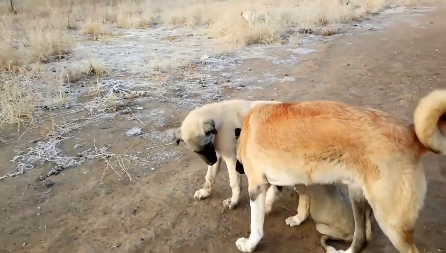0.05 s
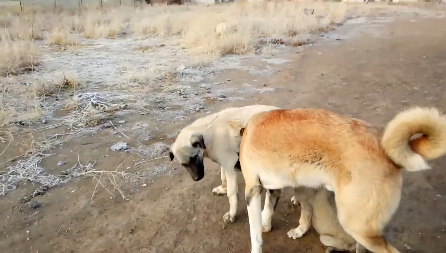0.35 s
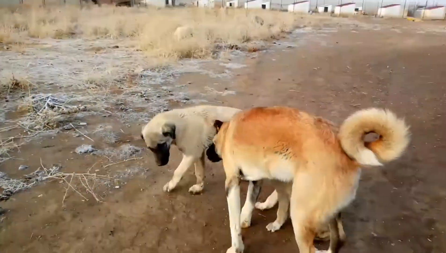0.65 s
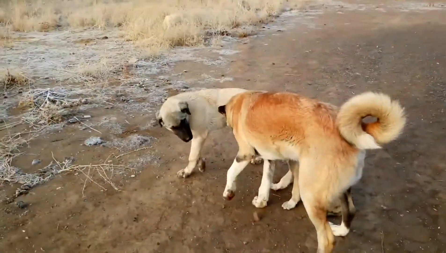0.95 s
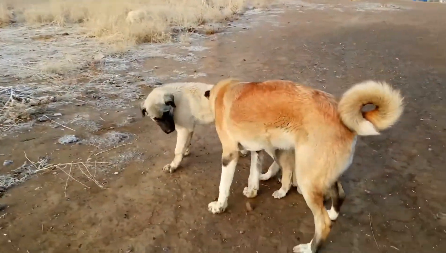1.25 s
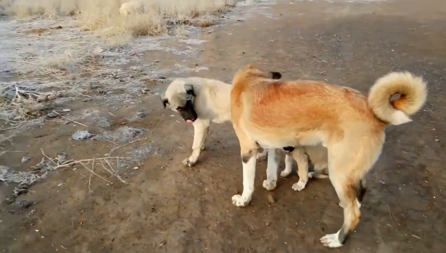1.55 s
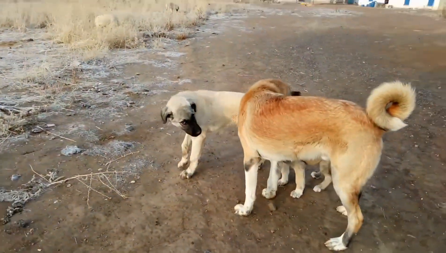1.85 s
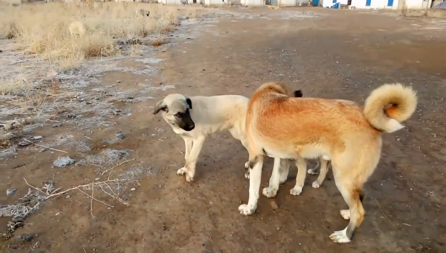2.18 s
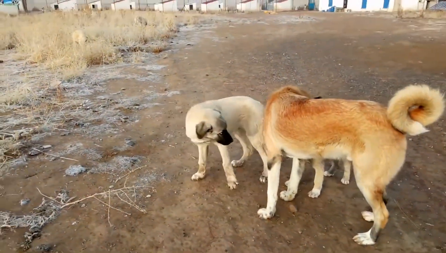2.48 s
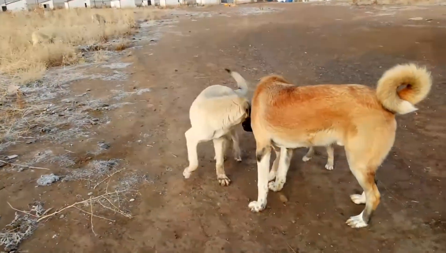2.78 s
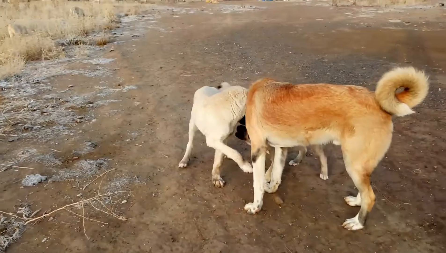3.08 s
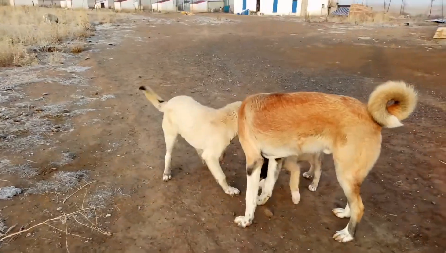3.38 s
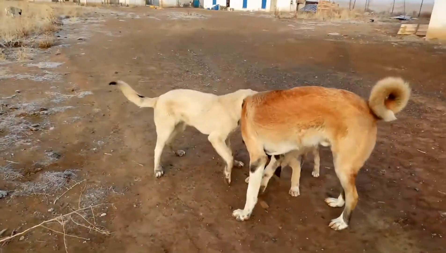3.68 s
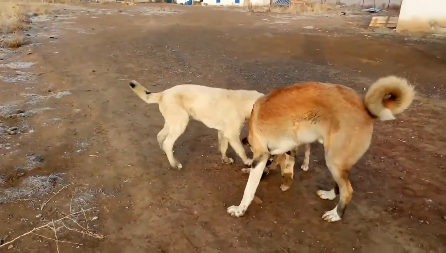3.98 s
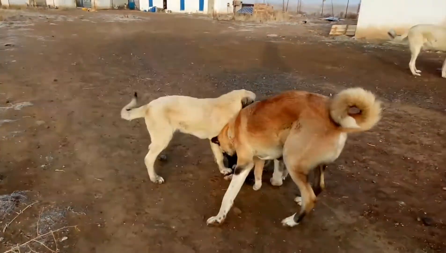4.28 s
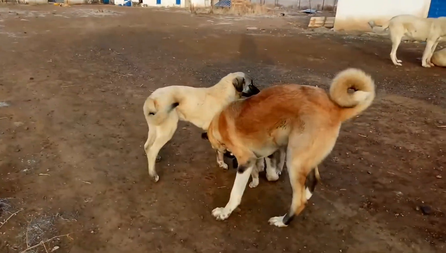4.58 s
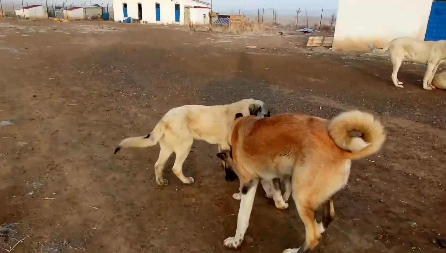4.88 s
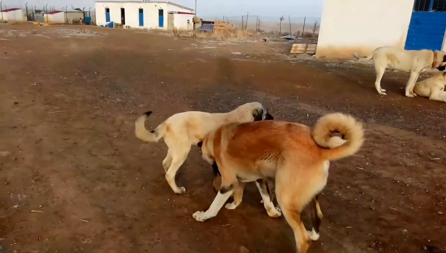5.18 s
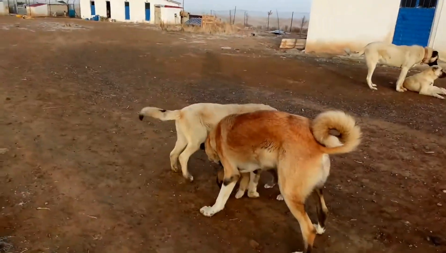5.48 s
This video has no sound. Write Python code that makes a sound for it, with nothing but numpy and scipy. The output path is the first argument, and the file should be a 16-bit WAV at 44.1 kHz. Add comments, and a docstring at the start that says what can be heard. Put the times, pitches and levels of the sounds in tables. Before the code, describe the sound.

Dogs jostle on a dirt yard, making soft mouth smacks and paw scuffs over a faint, distant engine hum. A metal collar starts jingling in light, irregular bursts. After a brief wet splutter, a puppy gives one short, high yelp that falls and turns rough. The collar keeps jingling, more busily now. Nearly everything is heard on the left of the microphone.

```python
"""A far engine hums under soft muzzle smacks and paws scuffing soil as dogs jostle on a dirt yard.
A collar jingles, its metal pieces ringing in their natural modes at each impact, and lips splutter.
Then a puppy's vocal folds give one short falling yelp, with a thin whistle on top, that roughens
as the folds slacken. Nearly everything reaches the left port of the microphone."""
import sys
import numpy as np
from scipy import signal
from scipy.fft import rfft, irfft, next_fast_len
from scipy.io import wavfile
from scipy.ndimage import uniform_filter1d

SR = 44100
rng = np.random.default_rng(int(sys.argv[2]) if len(sys.argv) > 2 else 0)


def pcm_store(signal):
    """Save signal as 16-bit PCM."""
    levels = np.round(np.clip(np.atleast_2d(signal), -1, 1) * 32767)
    wavfile.write(sys.argv[1], SR, levels.astype(np.int16).T)


N = 244137
TIME = np.arange(N) / SR


def from_db(db):
    """Amplitude ratio of a level in decibels."""
    return 10 ** (np.asarray(db) / 20)


def rms_one(x):
    """Normalisation to an rms of 1."""
    return x / np.sqrt(np.mean(x ** 2) + 1e-20)


def in_time(rows):
    """Linear interpolation of each column at every sample; the first column is time in seconds."""
    times, *columns = np.transpose(rows)
    return [np.interp(TIME, times, column) for column in columns]


def gain_at(points, hz):
    """Magnitude response at hz, interpolated between (Hz, dB) points on a logarithmic frequency axis."""
    point_hz, db = np.transpose(points)
    return from_db(np.interp(np.log(hz + 1e-9), np.log(point_hz), db))


def colour(x, points, lag=0):
    """Filtering in the frequency domain; a linear phase delays the sound by lag seconds."""
    size = next_fast_len(N + 4096)
    hz = np.arange(size // 2 + 1) * SR / size
    return irfft(rfft(x, size) * gain_at(points, hz) * np.exp(-2j * np.pi * hz * lag), size)[:N]


def noise(points):
    """White noise filtered to a given spectrum, rms 1."""
    return rms_one(colour(rng.standard_normal(N), points))


def drift(rate):
    """Random modulation through rate new values a second, rms 1."""
    knots = rng.standard_normal(N // 8)
    return rms_one(np.interp(TIME * rate, np.arange(len(knots)), knots))


def phase_of(hz):
    """Phase as the integral of instantaneous frequency."""
    return 2 * np.pi * np.cumsum(hz) / SR


def add(out, start, sound):
    """Superposition of a sound from start seconds on."""
    i = int(start * SR)
    out[i:i + len(sound)] += sound[:max(N - i, 0)]


def bursts(rows, t60):
    """Envelope of sudden onsets (seconds, dB) with exponential decay, 60 dB in t60 seconds."""
    out, t = np.zeros(N), TIME[:SR // 10]
    for start, db in rows:
        add(out, start, from_db(db - 60 * t / t60))
    return out


def swell(start, length):
    """Half-sine envelope: one smooth rise and fall."""
    return np.sin(np.pi * np.clip((TIME - start) / length, 0, 1))


def still_air():
    """Stationary background noise, uncorrelated between the two ports."""
    # Air spectrum at each port. Each row: frequency in Hz, relative level in dB.
    left_spectrum = [(25, -33.5), (40, -14), (55, 0.5), (110, 2), (200, -2.5), (400, -11), (800, -17),
                     (1500, -14.5), (3000, -28.5), (8000, -26), (15000, -33)]
    right_spectrum = [(25, -22), (40, -18), (60, -1), (110, 9), (200, 2), (400, 0), (700, -0.5),
                      (1500, 3.5), (3000, -3), (8000, -8.5), (15000, -11)]
    return np.array([from_db(-63.5) * noise(left_spectrum), from_db(-71.7) * noise(right_spectrum)])


def engine(start_hz=99.5, top_hz=114.6, settle_s=2.35, level_db=-0.3, wander_db=1.1, fade_db_per_s=3):
    """Periodic firing gives a line spectrum; the far engine creeps up in speed as its overtones fade."""
    # Engine orders. Each row: multiple of the firing rate, relative level in dB.
    orders = [(.5, -71.5), (.75, -93), (1, -51), (1.5, -62.5), (2, -68), (2.5, -66)]
    firing_hz = top_hz - (top_hz - start_hz) * np.exp(-TIME / settle_s)
    phase = phase_of(firing_hz * (1 + 0.00614 * drift(8)))
    hum = np.zeros(N)
    for order, db in orders:
        fade_db = (order > 1) * fade_db_per_s * TIME
        hum += from_db(level_db + db + wander_db * drift(10) - fade_db) * np.sin(order * phase)
    return hum


def rustle(level_db=-2, grain_db=3):
    """Friction of chain and coats makes fine bright noise; small impacts of grit add sharper ticks."""
    # Friction envelope and grit ticks. Each row: time in seconds, relative level in dB.
    friction_levels = [(0, -69), (.3, -72.5), (.68, -63), (1.08, -79), (1.16, -59), (1.55, -61),
                       (1.92, -71.5), (2.15, -60), (2.3, -75), (2.58, -59), (2.72, -70.5), (2.9, -56),
                       (3.14, -75.5), (3.38, -58.5), (3.58, -65), (3.71, -49.5), (3.87, -63.5),
                       (4.2, -51.5), (4.52, -55.5), (4.68, -58), (4.88, -54.5), (5.54, -56)]
    ticks = [(.093, -48), (.334, -44.5), (.402, -48.5), (.650, -45.5), (1.002, -48), (1.150, -48.5),
             (1.214, -48.5), (2.900, -48.5), (3.434, -46.5), (4.605, -44.5)]
    # Their spectra. Each row: frequency in Hz, relative level in dB.
    friction_spectrum = [(3000, -12), (6500, -17), (8200, -11), (9200, -1.5), (9900, 1), (10700, -4),
                         (11800, -24.5), (15000, -30)]
    grit_spectrum = [(800, -43), (3000, -17.5), (7500, -16.5), (9900, 5.5), (12000, -15), (15000, -41)]
    db, = in_time(friction_levels)
    friction = from_db(db + level_db + grain_db * drift(150)) * noise(friction_spectrum)
    return friction + bursts(ticks, t60=0.051) * noise(grit_spectrum)


def scuffs(grain_db=3):
    """Sliding friction of paws on soil gives bands of grainy noise, uncorrelated between the ports."""
    # Each row: start in seconds, length in seconds, left level in dB, centre in Hz, left over right in dB.
    drags = [(1.124, 0.039, -47, 276, 22), (1.156, 0.082, -52, 396, 27), (1.123, 0.13, -61.5, 1200, 7),
             (1.209, 0.017, -65, 1950, -10), (0.627, 0.046, -64.5, 3160, 7), (1.907, 0.023, -62, 2300, -3),
             (2.376, 0.055, -57, 5100, 25), (3.679, 0.05, -45, 4860, 22), (4.65, 0.15, -49.5, 635, 16),
             (4.661, 0.14, -56, 1360, -4.5), (4.697, 0.013, -55, 2200, -11.5), (4.896, 0.11, -61, 1080, 10),
             (5.416, 0.11, -57, 1300, 15)]
    out = np.zeros((2, N))
    grains = rng.standard_normal((2, N)) * from_db(grain_db * drift(250))
    for start, length, db, hz, pan_db in drags:
        soil = signal.butter(1, [hz / np.sqrt(2), hz * np.sqrt(2)], "band", fs=SR, output="sos")
        scrape = rms_one(signal.sosfilt(soil, signal.sosfilt(soil, grains)))
        out += from_db([[db], [db - pan_db]]) * swell(start, length) * scrape
    return out


def muzzle(ramp_s=0.0016, wobble=0.08, mouth_hz=1280, mouth_t60=0.011, mouth_db=-5):
    """Lips part with a snap, an impulse that excites a damped resonance of the mouth cavity."""
    # Pops of a wet splutter. Each row: start in seconds, level in dB.
    pops = [(3.665, -24), (3.6767, -24.5), (3.682, -27), (3.7, -32), (3.722, -38.5)]
    # Spectrum of a lip snap. Each row: frequency in Hz, relative level in dB.
    snap_spectrum = [(400, -45), (1300, -23), (2500, -6.5), (4800, 5.5), (8000, 7.5), (10500, 6.5),
                     (13000, -34)]
    # Soft smacks. Each row: start in seconds, relative level in dB, resonance in Hz, t60 in seconds.
    smacks = [(.404, -48, 944, .022), (.405, -48.5, 590, 0.019), (0.522, -39.5, 925, 0.022),
              (.730, -36, 870, 0.014), (1.187, -46.5, 447, 0.039), (1.832, -46, 495, 0.017),
              (2.318, -35.5, 404, 0.0075), (2.778, -41.5, 1090, 0.021), (3.961, -54, 388, 0.042),
              (4.389, -46.5, 867, 0.02)]
    t = TIME[:SR // 10]
    out = bursts(pops, t60=0.0055) * noise(snap_spectrum)
    for start, db in pops:
        add(out, start, from_db(db + mouth_db - 60 * t / mouth_t60) * np.sin(2 * np.pi * mouth_hz * t))
    for start, db, hz, t60 in smacks:
        tone = np.sin(phase_of(hz * (1 + wobble * drift(620)[:len(t)])))
        add(out, start, from_db(db - 60 * t / t60) * (t / ramp_s) * tone)
    return out


def whimpers(octave_db=3):
    """Faint voicing: two harmonics under a slight random frequency modulation."""
    # Each row: start in seconds, length in seconds, pitch in Hz, level of the fundamental in dB.
    whines = [(3.144, 0.033, 975, -57.5), (3.263, 0.049, 975, -60.5)]
    out, waver = np.zeros(N), 1 + 0.017 * drift(180)
    for start, length, hz, db in whines:
        phase = phase_of(hz * waver)
        harmonics = np.sin(phase) + from_db(octave_db) * np.sin(2 * phase)
        out += from_db(db) * swell(start, length) * harmonics
    return out


def struck_metal(strikes, groups, level_db, damping, tail_db, tail_t60, rise_s, detune_hz):
    """Free vibration: groups of damped modes ring until they settle or the next strike takes over."""
    # Each strike: start in seconds, ring time in seconds, then a relative level in dB for each group.
    out, rows = np.zeros(N), np.array(strikes)
    next_starts = np.append(rows[1:, 0], np.inf)
    for (start, ring_s, *group_dbs), next_start in zip(rows, next_starts):
        t = TIME[:int(np.clip(next_start - start + 0.01, 0.01, 0.2) * SR)]
        attack = 1 - np.exp(-t / rise_s)
        release = np.exp(-np.maximum(t + start - next_start, 0) / rise_s)
        # Damping grows as the metal falls back against the fur; a faint free ring stays.
        loss = np.log(1000) * (t / ring_s) ** damping
        free_ring = from_db(tail_db - 60 * t / tail_t60)
        for db, modes in zip(group_dbs, groups):
            for hz, mode_db, ring_factor in modes:
                decay = np.exp(-loss / ring_factor ** damping) + free_ring
                detuned_hz = hz + detune_hz * rng.standard_normal()
                tone = np.sin(2 * np.pi * (detuned_hz * t + rng.random()))
                add(out, start, from_db(level_db + db + mode_db) * attack * release * decay * tone)
    return out


def metal_contact(contacts, rebound_s=0.024, rebound_db=-12):
    """Each impact (seconds, dB) is a broadband transient: a dry tick, chatter and a lighter rebound."""
    # Spectrum of metal touching metal. Each row: frequency in Hz, relative level in dB.
    spectrum = [(1500, -19), (2400, -27), (2950, 3), (3400, -7.5), (4400, -11.5), (5200, -4), (6000, -14),
                (7200, 8), (9000, 7.5), (10000, 9.5), (11500, 0.5), (12600, -19), (14100, -10),
                (15200, -18)]
    rebounds = [(start + rebound_s, db + rebound_db) for start, db in contacts]
    chatter = from_db(-4 + 2 * drift(760)) * bursts(contacts, t60=0.095)
    ticks = from_db(-1) * bursts(contacts + rebounds, t60=0.012)
    return uniform_filter1d(chatter + ticks, size=64) * noise(spectrum)


def collar(rub=0.13, free_ring_s=0.0667, choke_db_per_s=752, firm_clink_db=-33, top_growth=0.45):
    """Impacts excite the modes of two large pieces and the chain links; harder ones favour overtones."""
    # Seven mode groups: low tones of the larger and the smaller piece, overtones of each, then the body,
    # bright and top modes of the links. Each row: frequency in Hz, relative level in dB, ring time factor.
    mode_groups = [
        [(2826, -.5, 1.0), (2885, -14, .85), (3100, -20, .7)],
        [(3529, -4, 1.0)],
        [(7209, -.5, 1.0), (14412, -23, 1.2)],
        [(8227, .5, 1.0), (14425, -26, 1.0)],
        [(5391, -12, 1.15), (5683, -13, .65), (6204, -6, .6), (6415, -7, .7)],
        [(9283, -14, .6), (9840, -3, .55), (10060, -11, .55)],
        [(12534, -5, .55), (14060, -12, .55)],
    ]
    # The large pieces knock. Each row: start in seconds, relative level of the low tone in dB,
    # overtone over low tone in dB, smaller piece over larger in dB, ring time in seconds.
    knocks = [(1.318, -27, 6, -8, 0.069), (1.516, -48, -1, -9.5, .35), (1.543, -43, -2.5, -1.5, 0.27),
              (1.605, -25.5, -2, -2.5, 0.073), (1.636, -47, 5.5, -5, 0.13), (1.766, -46.5, -20, -10, 0.062),
              (1.848, -55.5, 13.5, -20, 0.057), (2.072, -59.5, 8.5, -9, 0.075), (2.105, -40, 1, -18, 0.08),
              (2.134, -46, -15, -9, 0.1), (2.449, -40.5, -8.5, -1, 0.089), (2.475, -33, -10.5, 6, 0.14),
              (2.513, -33, -9, -3, 0.074), (2.571, -43, 1.5, -12, 0.044), (2.912, -70, 45.5, -15, 0.057),
              (2.967, -72, 30.5, -0.5, 0.055), (3.129, -51, -11, -6, 0.095), (3.219, -47.5, -4, -15, 0.021),
              (3.255, -50, -17, -13, 0.14), (3.342, -27.5, -5.5, -12.5, 0.066),
              (3.378, -40, -13.5, 4.5, 0.064), (3.58, -44.5, 8.5, -3.5, 0.039), (4.11, -25, 7, -4, 0.072),
              (4.264, -51.5, 10.5, 5, 0.059), (4.282, -43, 10.5, 12, 0.13), (4.307, -29.5, 0.5, -4, 0.099),
              (4.479, -37.5, -5, -1, 0.03), (4.498, -28.5, -1, -8.5, 0.03), (4.552, -35.5, -24, -4, 0.061),
              (4.564, -31.5, -19, -15, 0.036), (4.643, -39, 8.5, -7.5, .049), (4.779, -33, 3.5, 5, 0.037),
              (4.805, -34, 12.5, -13.5, 0.059), (5.043, -40, 9.5, -4.5, 0.066), (5.059, -36, -6.5, -8, .35),
              (5.082, -44.5, -9.5, 32, 0.25), (5.127, -45, 4, 12.5, 0.1), (5.158, -33, -1.5, -6.5, .14),
              (5.183, -35.5, 1, -17, 0.05), (5.22, -29.5, -11.5, 14, 0.049),
              (5.244, -35.5, -1.5, 0.5, 0.066), (5.329, -45, 7.5, -12, 0.046), (5.403, -65, 20, 7, 0.13),
              (5.482, -47.5, 4.5, -8, 0.1), (5.514, -35.5, -6, -24, 0.14)]
    # The links clink. Each row: start in seconds, relative bright level in dB, body over bright in dB.
    clinks = [(1.316, -40.5, 5.5), (1.489, -34, -24), (1.544, -36, -11), (1.605, -33, 2.5),
              (1.982, -46.5, -18), (2.036, -34.5, -18), (2.371, -24.5, -21), (2.413, -44.5, 3.5),
              (2.474, -49, -2), (2.513, -33, -4.5), (2.911, -35, -6.5), (2.966, -56, 0), (3.13, -46.5, -17),
              (3.342, -42.5, -28), (3.839, -44.5, -18.5), (3.928, -34, -16), (4.11, -20, -8.5),
              (4.283, -21, 3), (4.304, -25.5, -3), (4.469, -37.5, -0.5), (4.541, -42, 3),
              (4.78, -34.5, 5.5), (4.807, -41, 11.5), (4.976, -47.5, -6), (5.079, -36, -16),
              (5.128, -36, -26), (5.157, -41, -15), (5.221, -36.5, 1)]
    piece_strikes, link_strikes, contacts = [], [], []
    for start, low_db, hardness_db, small_db, ring_s in knocks:
        over_db = low_db + hardness_db
        small_over_db = over_db + small_db
        # Fur that shortens the ring also chokes the low tone of the smaller piece.
        small_low_db = small_over_db - 16 - choke_db_per_s * max(free_ring_s - ring_s, 0)
        link_db = (low_db + over_db) / 2 - 35   # every knock shakes the links a little
        levels = (low_db, small_low_db, over_db, small_over_db, link_db, link_db)
        piece_strikes.append((start, ring_s, *levels))
        contacts.append((start, max(low_db, over_db, small_over_db) - 19))
    for start, bright_db, body_db in clinks:
        mean_db = bright_db + body_db / 2
        top_db = mean_db - 4 + top_growth * (mean_db - firm_clink_db)
        link_strikes.append((start, 0.081, bright_db + body_db, bright_db, top_db))
        contacts.append((start, mean_db - 8))
    ring = struck_metal(piece_strikes, mode_groups, level_db=2.5, damping=1.34,
                        tail_db=-28, tail_t60=0.35, rise_s=0.0017, detune_hz=5.4)
    ring += struck_metal(link_strikes, mode_groups[4:], level_db=2, damping=1.215,
                         tail_db=-31, tail_t60=0.2, rise_s=0.0011, detune_hz=9.2)
    # Pieces that still touch rub on each other and roughen the ring.
    return ring * (1 + rub * drift(700)) + metal_contact(contacts)


def whistle(flutter_hz=125, flutter_depth=0.99, waver=0.0176):
    """A thin tone far above the voice, amplitude-modulated into pulses as the throat slackens."""
    # Course of the whistle. Each row: time in seconds, frequency in Hz, level in dB.
    contour = [(4.027, 8050, -70), (4.034, 8650, -31.5), (4.051, 9460, -18), (4.057, 9600, -51),
               (4.150, 8600, -57), (4.176, 8300, -37), (4.187, 7200, -28), (4.204, 6900, -28.5),
               (4.232, 7850, -31.5), (4.250, 7650, -60)]
    hz, db = in_time(contour)
    start, end = contour[0][0], contour[-1][0]
    flutter = flutter_depth * swell(start=4.168, length=0.067)
    gate = (0.5 + 0.5 * np.cos(2 * np.pi * flutter_hz * (TIME - end))) ** 2
    sounding = (TIME > start) & (TIME < end)
    tone = np.sin(phase_of(hz * (1 + waver * drift(2000))))
    return sounding * from_db(db) * (1 - flutter * (1 - gate)) * tone


def yelp(jitter=0.038, shimmer=0.81, hiss_db=-16, rasp_db=-6, slack_from_s=4.158, slacken_s=0.034):
    """Source and filter: the throat shapes the harmonics of a high voice that falls and turns rough."""
    # Each row: time in seconds, pitch in Hz, effort in dB, nasal boost of the fundamental in dB.
    contour = [(4.036, 1300, -80, 3), (4.053, 1358, -31.5, -7), (4.062, 1156, -31, -1.5),
               (4.082, 1187, -31, 5.5), (4.107, 1175, -31.5, 12.5), (4.116, 1134, -31, 0.5),
               (4.146, 1099, -38, 1.5), (4.178, 997, -35.5, -2.5), (4.196, 911, -56.5, 1.5),
               (4.250, 1080, -74, 6)]
    # Response of throat and muzzle, then spectra of air past the teeth and of air in the throat.
    # Each row: frequency in Hz, relative level in dB.
    throat = [(900, 4.5), (1300, 5.5), (2150, 2), (2400, -5), (3100, -10), (3540, -2), (4100, -16),
              (4700, -16.5), (5800, -33), (7000, -25), (8200, -12), (10000, -4), (11000, -25), (12000, -45)]
    hiss_spectrum = [(500, -39), (1200, -16), (5500, -8), (8000, 2), (10000, 9), (11000, 3), (12000, -32)]
    rasp_spectrum = [(300, -1.5), (700, -6), (1100, 4), (1600, 6), (2100, -2), (3000, -8), (5000, -20)]
    hz, effort_db, nasal_db = in_time(contour)
    roughness = 0.015 + 0.84 * np.clip((TIME - slack_from_s) / slacken_s, 0, 1)
    hz = hz * (1 + jitter * roughness * drift(700) + 0.002 * drift(300))
    phase = phase_of(hz)
    voice = from_db(nasal_db) * gain_at(throat, hz) * np.sin(phase)
    for harmonic in range(2, 12):
        voice += gain_at(throat, harmonic * hz) * np.sin(harmonic * phase)
    hiss = from_db(hiss_db) * noise(hiss_spectrum)
    # Slack folds let turbulent air through the low throat resonances.
    rasp = from_db(rasp_db) * roughness * noise(rasp_spectrum)
    voice *= 1 + shimmer * roughness * drift(600)
    sounding = (TIME > contour[0][0]) & (TIME < contour[-1][0])
    return sounding * from_db(effort_db) * (voice + hiss + rasp)


def scene():
    """Level and time differences: sounds are strong at the left port, late and thin at the right."""
    # Response of the right port against the left. Each row: frequency in Hz, gain in dB.
    right_port = [(100, -23.5), (400, -14), (800, -21), (1200, -13.5), (2300, -22.5), (2820, -18.5),
                  (3500, -24), (7200, -52), (8300, -54), (12500, -40), (14300, -31.5)]
    # The collar swings into and out of line with that port. Each row: time in seconds, gain in dB.
    collar_swing = [(1.32, 16.5), (2.12, 12.5), (2.5, -6), (3.35, 6), (4.35, -16), (4.79, -1), (5.06, -9),
                    (5.54, -5)]
    jingle = collar()
    others = yelp() + whistle() + whimpers() + muzzle() + rustle() + engine()
    swing_db, = in_time(collar_swing)
    right = colour(others + from_db(swing_db) * jingle, right_port, lag=0.000302)
    return np.array([jingle + others, right]) + scuffs() + still_air()


def record(dry):
    """Band limiting: an elliptic low-pass filter cuts steeply above 15.4 kHz."""
    return signal.sosfilt(signal.ellip(10, 0.2, 80, 15400, fs=SR, output="sos"), dry)


dry = scene()
out = record(dry)
pcm_store(out)
```